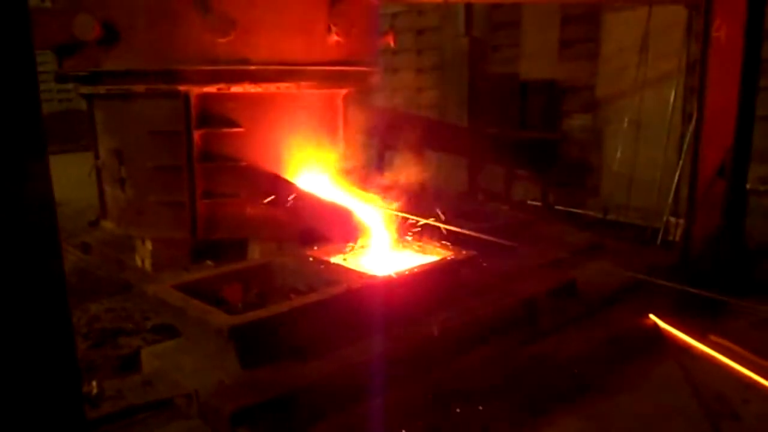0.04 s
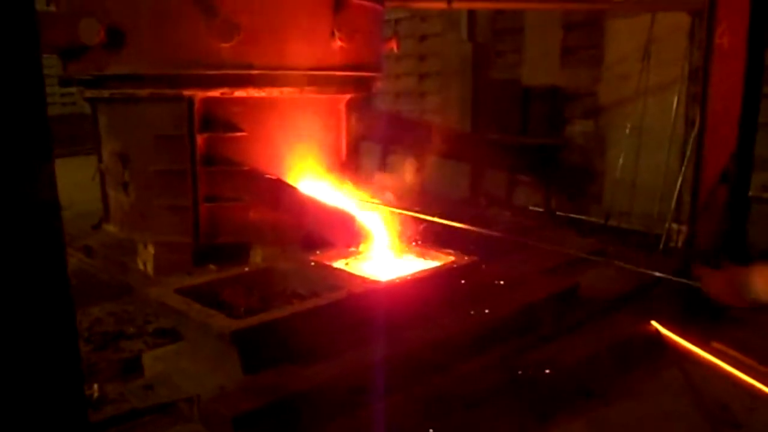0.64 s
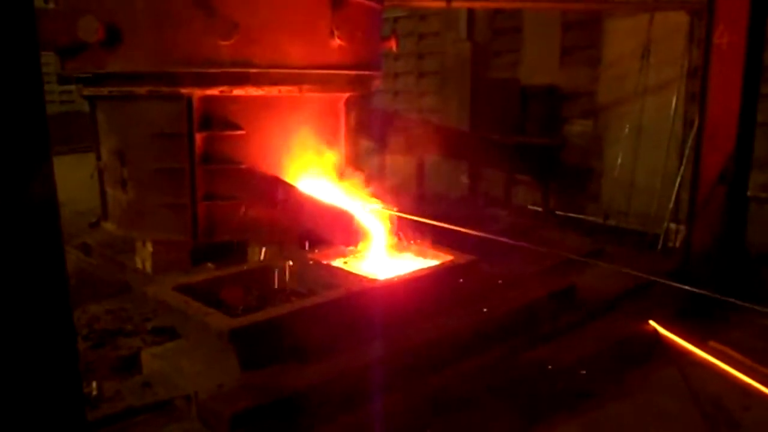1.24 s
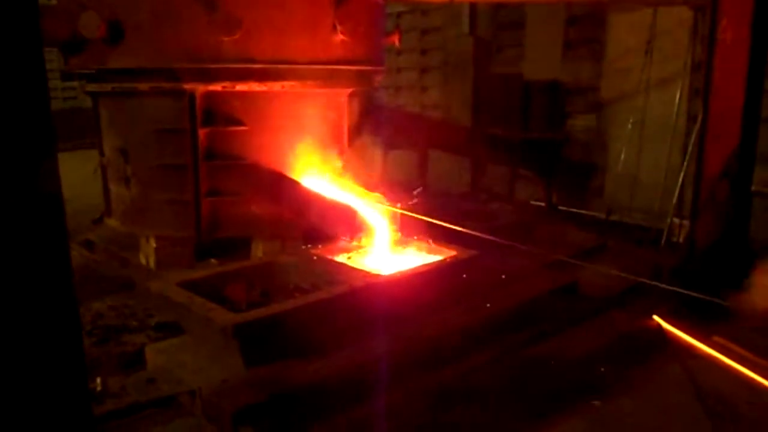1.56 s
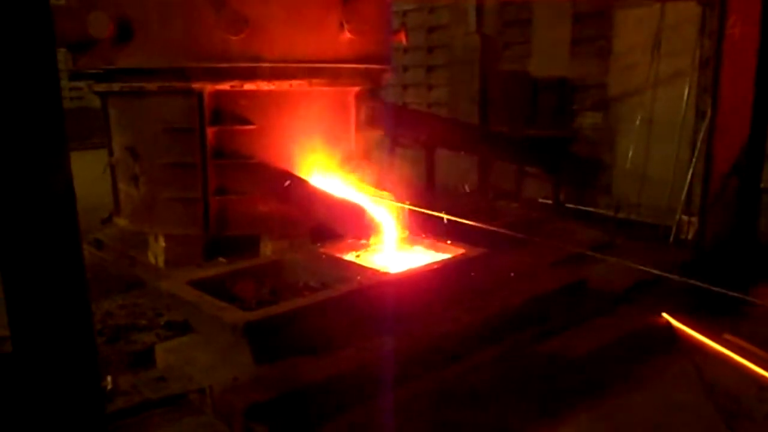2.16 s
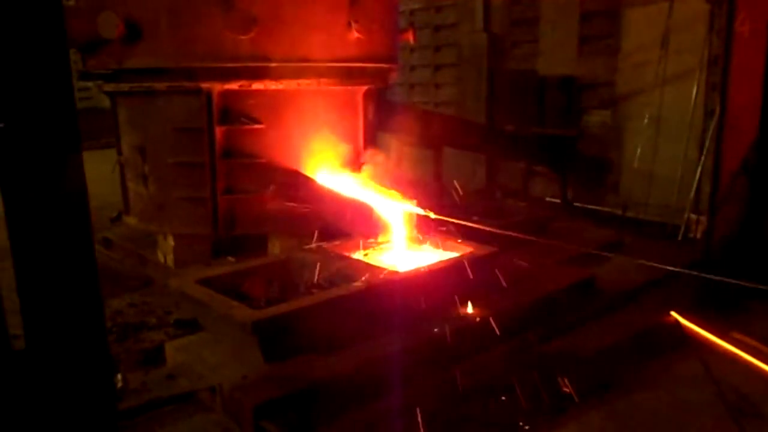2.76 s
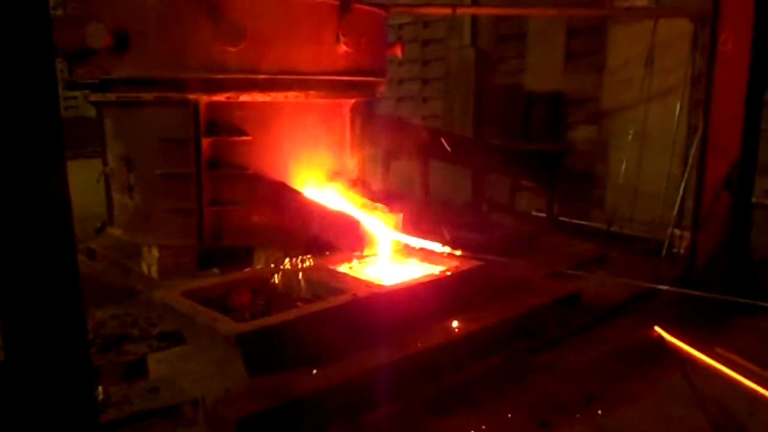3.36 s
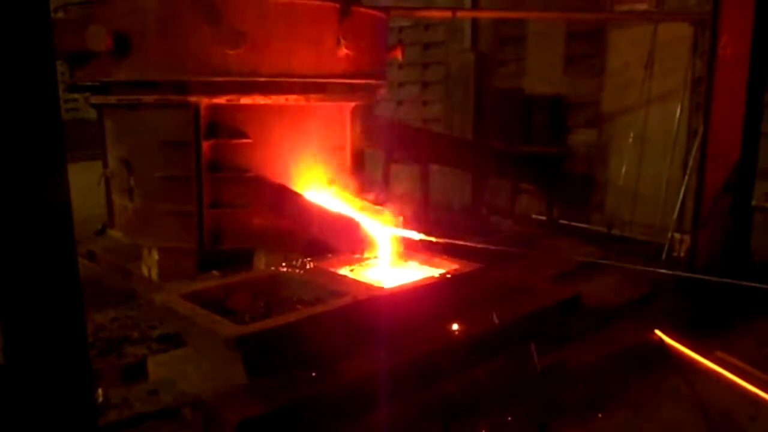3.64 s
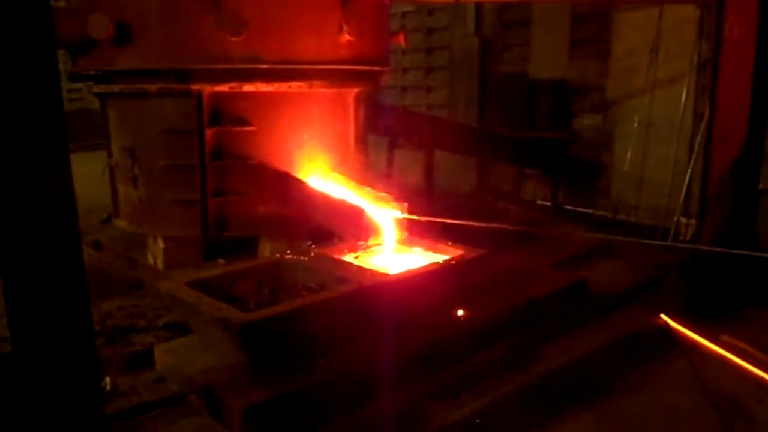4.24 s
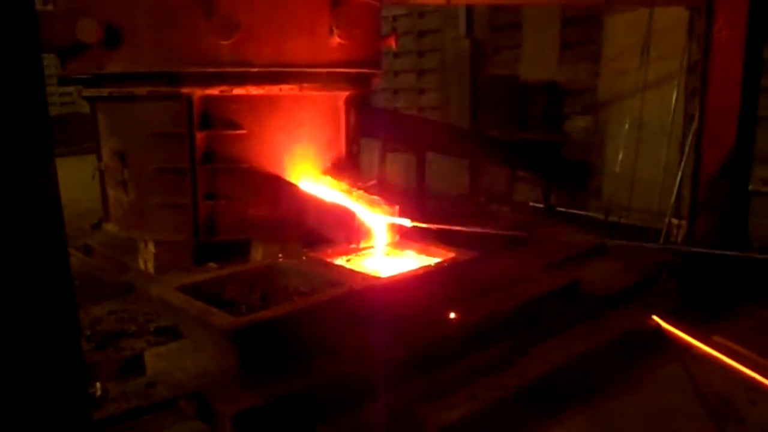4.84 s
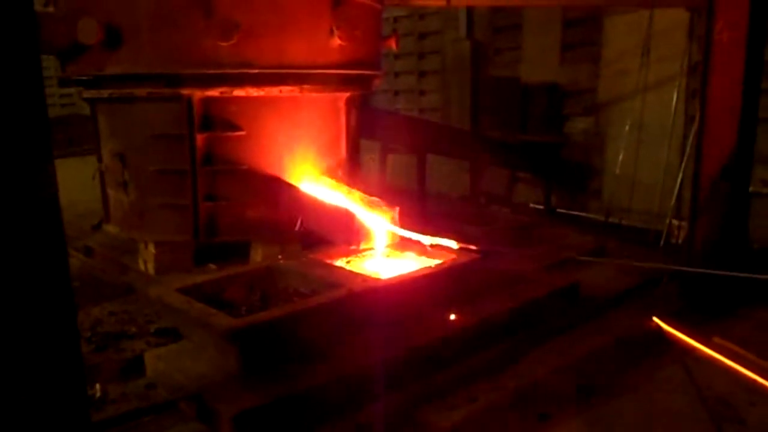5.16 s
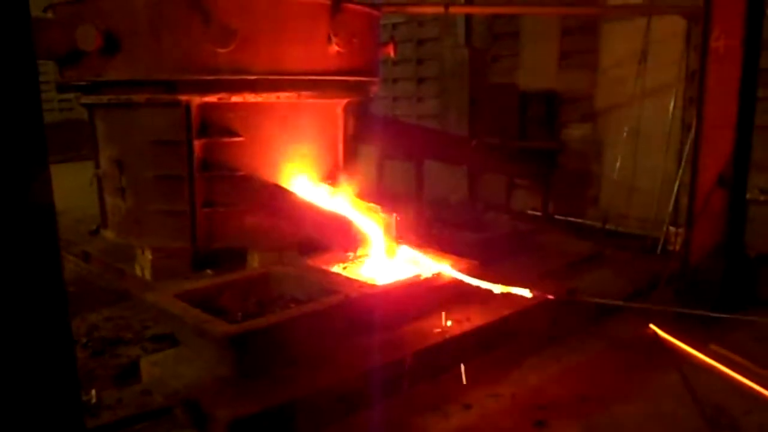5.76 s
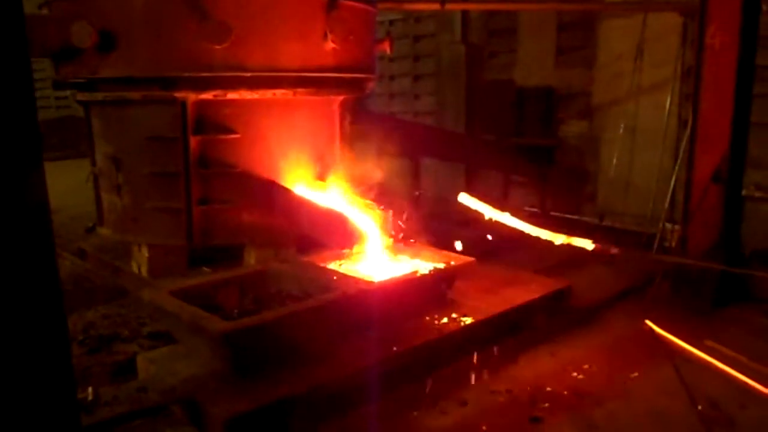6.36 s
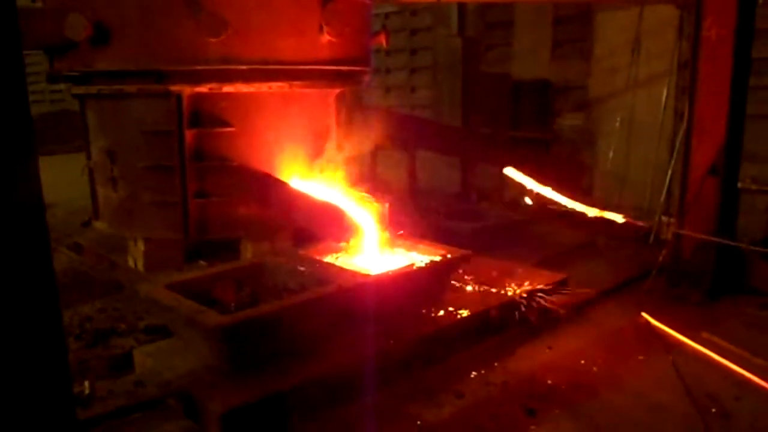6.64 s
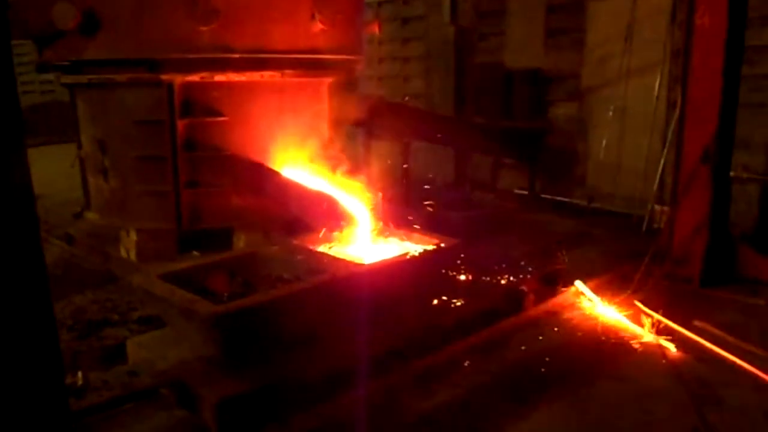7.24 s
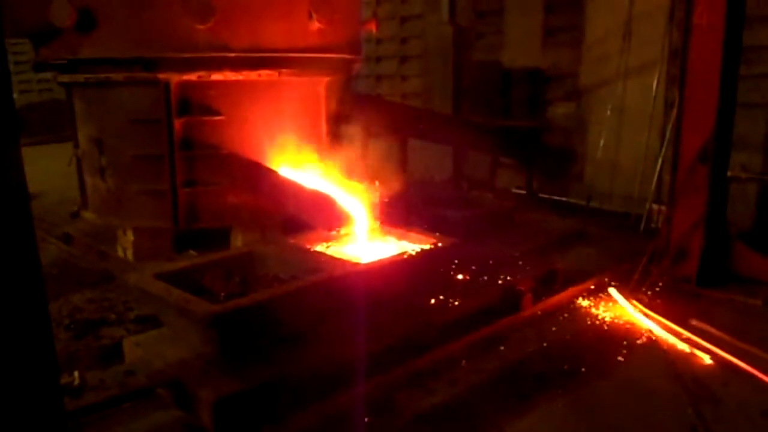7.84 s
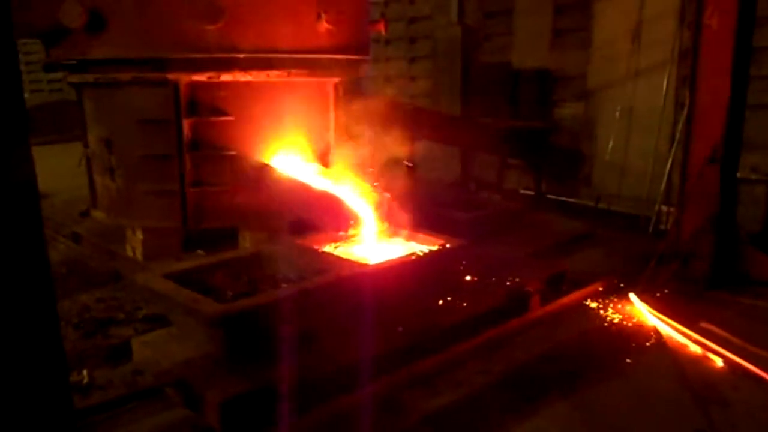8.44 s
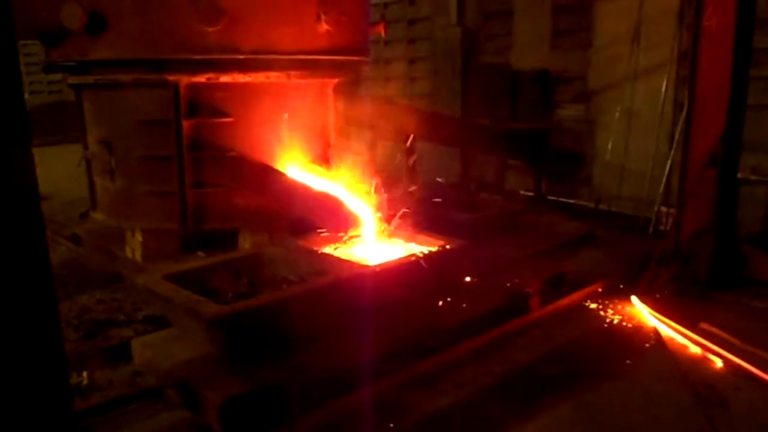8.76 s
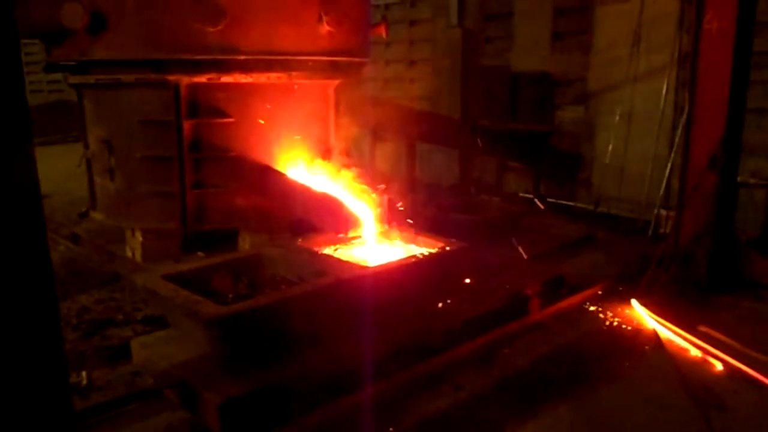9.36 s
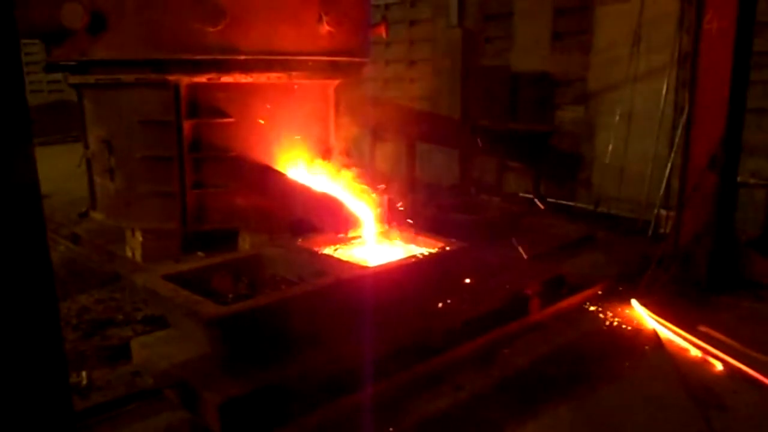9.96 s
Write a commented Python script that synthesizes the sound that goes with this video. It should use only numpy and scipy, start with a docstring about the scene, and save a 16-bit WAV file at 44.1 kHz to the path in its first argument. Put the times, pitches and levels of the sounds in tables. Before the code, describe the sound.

From the start a furnace roars loudly and steadily in a smelter hall as molten metal runs out. A low, wavering drone rings in the ducts, a blower hums, gas hisses and sparks crackle finely, all with slight short reflections. Near 0.9 seconds droplets burst with sharp snaps and a steel rod knocks and bounces with a short, high ring; the whole din dips slightly and creeps back. More snaps, each followed by a small dip, come at 2.8 and 6.4 seconds. Faint, brief high pings sound in the noise at about 2, 5.8, 6.3, 7.3 and 7.7 seconds. At 7.2 seconds a spark snaps and the rod is laid down with a softer clink. A very slight dip follows at 7.8 seconds. The roar carries on until 9.2 seconds, when everything stops dead.

```python
"""Molten metal runs from the tap hole of a furnace in a smelter hall. From the start the blast roars and drones
in shaft and ducts, a blower hums, gas hisses, sparks crackle. Near 0.9 s droplets burst, a steel rod knocks and
bounces, and the whole din dips and creeps back. From 2 s faint brief high pings sound in the din; bursts and
dips recur at 2.8 and 6.4 s. At 7.2 s a spark snaps and the rod is laid down. A slight dip follows; at 9.2 s all
sound ends abruptly."""
import sys
import numpy as np
from scipy import signal
from scipy.fft import rfft, irfft
from scipy.io import wavfile
from scipy.ndimage import uniform_filter1d

SR = 44100
rng = np.random.default_rng(int(sys.argv[2]) if len(sys.argv) > 2 else 0)


def to_wav(s):
    """Save 16-bit WAV."""
    ch = np.atleast_2d(s).T  # columns
    pcm = np.round(np.clip(ch, -1, 1) * 32767)  # PCM
    wavfile.write(sys.argv[1], SR, pcm.astype(np.int16))


N = 440559
TIME_S = np.arange(N) / SR
FREQ_HZ = np.fft.rfftfreq(N, 1 / SR)

# Gas flow through the furnace. Each row: time in seconds, strength in dB.
GAS_FLOW = [(0, 0.6), (0.8, 0.5), (1.45, 0.16), (2.05, 1), (2.25, -0.54), (3.35, 0.3), (4.05, -0.67),
            (5.1, 1.1), (5.5, 0.05), (5.8, 1), (6.05, 0.2), (6.4, 1.3), (7.3, 1.2), (8.15, 0.35),
            (8.65, 0.7), (9.2, 0.5)]
# Blast turbulence. Each row: frequency in Hz, relative density in dB.
ROAR_SPECTRUM = [(8, -69.5), (19, -55.5), (30, -65.5), (60, -64.5), (78, -66), (130, -59.5), (165, -53.5),
                 (560, -55), (770, -57), (880, -55.5), (1300, -58.5), (1550, -58), (1640, -61.5),
                 (2500, -62.5), (4000, -64.5), (10000, -78)]
# Air resonances of shaft and ducts. Each row: frequency in Hz, width in Hz, lift in dB.
DUCT_MODES = [(167, 6, 8.5), (209.5, 6, 10), (218, 7, 10), (231, 6.5, 6), (276.6, 7.9, 3.5),
              (335, 9.3, 3.5), (408.8, 6.4, 8.5), (426, 5, 2), (486.4, 8.2, 3.5), (853, 46, 3),
              (930, 12, 3.5), (974, 8.9, 1.5), (1078, 12, 6), (1142, 12, 3), (1227, 14, 4), (1427, 25, 3),
              (1820, 30, 4.5), (1970, 20, 3), (2215, 18, 5), (2438, 29, 4)]
# Strongest duct resonance. Each row: time in seconds, relative level in dB.
DRONE_LEVELS = [(0, -40.5), (0.35, -31.5), (1.0, -39), (1.6, -38.5), (1.88, -31.0), (2.15, -36.5),
                (2.7, -39), (3.0, -33), (4.65, -37.5), (5.0, -28), (5.45, -32.5), (5.85, -41), (6.4, -29.8),
                (6.7, -42), (7.15, -30), (7.45, -38.5), (7.75, -30), (9.2, -44)]
# Blower tones. Each row: multiple of shaft speed, relative level in dB, flutter from 0 to 1.
BLOWER_ORDERS = [(1, -41, .45), (3, -34, 0.5), (14, -49.5, 0.7), (15, -42, 0), (16, -40, 0.2),
                 (28, -47.5, 0.6), (30, -46.5, .5)]
# Gas jet at the tap hole. Each row: frequency in Hz, relative density in dB.
HISS_SPECTRUM = [(1500, -67.5), (3150, -68), (3800, -58.5), (4700, -58), (5300, -58), (6000, -61),
                 (7700, -61.5), (10000, -66)]
# Faint tap hole whistles. Each row: frequency in Hz, width in Hz, lift in dB.
WHISTLE_MODES = [(3400, 140, 3), (4940, 40, 2), (5075, 90, 4.2), (5275, 70, 1.8), (8920, 110, 1.8),
                 (9800, 180, 1.2)]
# Bursting droplets. Each row: start in seconds, level in dB, decay in seconds.
SPARK_BURSTS = [(.8578, -20, .0014), (.8785, -11, 0.0022), (0.8835, -15, .005), (2.788, -11, .0012),
                (2.7925, -18.5, .011), (6.3895, -26, .002), (6.398, -23.5, .005), (7.236, -19.5, .01)]
# Colour of sparks and rod contact. Each row: frequency in Hz, relative level in dB.
SNAP_SPECTRUM = [(500, -15), (2500, -11), (4500, -0.5), (6000, -4), (8300, -1), (10000, -0.5),
                 (12000, -25.5)]
# The rod knocks, bounces, is laid down. Each row: start in seconds, relative level in dB.
ROD_KNOCKS = [(.9347, -14.5), (0.9402, -13), (7.24, -25)]
# Steel rod modes. Each row: frequency in Hz, relative level in dB, T60 in seconds.
ROD_MODES = [(3360, -6, .13), (3500, -19.5, .13), (5140, -4, .08), (5400, -12, .08), (6100, -8.5, .07),
             (6400, -11, .07), (8800, -15, .05)]
# Faint brief high pings in the din.
# Each row: start in seconds, frequency in Hz, level in dB, T60 in seconds.
FAINT_PINGS = [(2.012, 5450, -17, .1), (5.76, 3800, -22, .15), (6.325, 2890, -27, .15),
               (7.255, 3120, -26, .15), (7.718, 2440, -21, .15)]
# Sudden dips of the whole din. Each row: start in seconds, nominal depth in dB.
LEVEL_DIPS = [(.888, 2.5), (.947, 2.5), (2.803, 3), (6.405, 4), (7.785, 1.2)]

ROAR_DB_PER_FLOW_DB, BLOWER_DB_PER_FLOW_DB = 1.1, .6
SURGE_TOP_HZ, SURGE_DB_PER_FLOW_DB, SURGE_DRIFT_DB = 481, .5, .5
DRONE_HZ, DRONE_WANDER_HZ = 332.5, 4.2
SHAFT_HZ, MOTOR_HUM_DB = 49.55, -43
MAINS_HUM_HZ, MAINS_HUM_DB = 100.06, -39
DIP_FALL_S, DIP_RECOVERY_S, STOP_S = .0098, .5, 9.238
PEAK_CEILING, LOWPASS_HZ = .8, 10350


def blast(flow_db):
    """The fluttering flame roar rings shaft and ducts; its deep part surges with the gas flow."""
    eddies = turbulence(patch_db=.58, patch_hz=500, patch_s=.06)
    roar = colour(eddies, spectrum_gain(ROAR_SPECTRUM) * resonance_gain(DUCT_MODES))
    deep = colour(roar, 1 / (1 + (FREQ_HZ / SURGE_TOP_HZ) ** 4))
    surge_db = SURGE_DB_PER_FLOW_DB * (flow_db - flow_db.mean()) + SURGE_DRIFT_DB * drift(3)
    roar = roar - deep + deep * gain_of(surge_db)
    return hall(roar, echo_db=-13.5) * gain_of(ROAR_DB_PER_FLOW_DB * flow_db + .27 * drift(11) + .2)


def duct_drone():
    """One duct mode sings almost as a tone, its phase wandering."""
    wander = drift(DRONE_WANDER_HZ) + 1j * drift(DRONE_WANDER_HZ)
    wander = wander / np.sqrt(abs(wander) ** 2 + .5)  # the swing saturates
    tone = (wander * np.exp(2j * np.pi * DRONE_HZ * TIME_S)).real
    level_db = np.interp(TIME_S, *np.transpose(DRONE_LEVELS)) + 1.9
    return unit_rms(tone) * gain_of(level_db)


def blower(flow_db):
    """Shaft tones waver in hot air; the motor's second order beats with the mains hum once a second."""
    turns = np.cumsum(SHAFT_HZ * (1 + .0002 * drift(1.6))) / SR
    tones = np.zeros(N)
    for order, db, flutter in BLOWER_ORDERS:
        waver = np.sqrt(2 * (1 - flutter ** 2)) + flutter * (drift(2) + 1j * drift(2.2))
        phasor = np.exp(2j * np.pi * (order * turns + rng.random()))
        tones += gain_of(db) * (waver * phasor).real
    motor = gain_of(MOTOR_HUM_DB) * unit_rms(np.sin(2 * np.pi * 2 * turns))
    mains = gain_of(MAINS_HUM_DB) * unit_rms(np.sin(2 * np.pi * MAINS_HUM_HZ * TIME_S))
    return tones * gain_of(BLOWER_DB_PER_FLOW_DB * flow_db + .4) + mains - motor


def gas_jet(flow_db):
    """Gas leaves the tap hole with a sputtering hiss and faint whistles."""
    eddies = turbulence(patch_db=.6, patch_hz=890, patch_s=.04)
    hiss = colour(eddies, spectrum_gain(HISS_SPECTRUM) * resonance_gain(WHISTLE_MODES))
    return hall(hiss, echo_db=-9.5) * gain_of(flow_db + .28 * drift(9) - .42)


def sparks(crackle_per_s=280, pop_decay_s=.0004):
    """Droplets burst with short snaps, over a fine crackle of countless small ones."""
    snap_gain = spectrum_gain(SNAP_SPECTRUM)
    power = np.zeros(N)
    for start_s, db, decay_s in SPARK_BURSTS:
        age_s = TIME_S - start_s
        power += gain_of(db) ** 2 * (age_s >= 0) * np.exp(-2 * (age_s / decay_s) ** 2)
    snaps = unit_rms(colour(rng.standard_normal(N), snap_gain)) * np.sqrt(power)
    pop_db = 2.6 * np.minimum(rng.exponential(1, N), 3.5)
    pops = gain_of(pop_db) * (rng.random(N) < crackle_per_s / SR)
    envelope = signal.lfilter([1], [1, -np.exp(-1 / (pop_decay_s * SR))], pops)
    crackle = colour(envelope * rng.standard_normal(N), snap_gain)
    return snaps + gain_of(-34.5) * unit_rms(crackle)


def steel_rod():
    """Each knock is a short gritty contact and a quickly damped ring."""
    age_s = np.arange(SR // 4) / SR
    grit = unit_rms(colour(rng.standard_normal(N), spectrum_gain(SNAP_SPECTRUM)))
    out = np.zeros(N)
    for start_s, db in ROD_KNOCKS:
        span = slice(round(start_s * SR), round(start_s * SR) + len(age_s))
        ring = sum(gain_of(mode_db - 60 * age_s / t60_s) * np.sin(2 * np.pi * (hz * age_s + rng.random()))
                   for hz, mode_db, t60_s in ROD_MODES)
        contact = grit[span] * np.exp(-age_s / .003)
        out[span] += gain_of(db) * (gain_of(-1) * ring + contact)
    return out


def faint_pings():
    """Each ping is one high tone dying away after a soft start."""
    out = np.zeros(N)
    for start_s, hz, db, t60_s in FAINT_PINGS:
        age_s = np.maximum(TIME_S - start_s, 0)
        attack = 1 - np.exp(-age_s / .002)
        out += gain_of(db - 60 * age_s / t60_s) * attack * np.sin(2 * np.pi * hz * age_s)
    return out


def hall(x, echo_db, count=40):
    """Reflections from walls and steelwork comb the sound finely."""
    delay_s, sign = rng.uniform(.004, .09, count), rng.choice([-1, 1], count)
    taps = np.zeros(N)
    taps[(delay_s * SR).astype(int)] = sign * gain_of(echo_db) / np.sqrt(count)
    bass_cut = FREQ_HZ ** 2 / (FREQ_HZ ** 2 + 400 ** 2)  # small surfaces reflect no bass
    echoes = colour(x, rfft(taps) * bass_cut)
    return (x + echoes) / np.sqrt(1 + gain_of(echo_db) ** 2)


def turbulence(patch_db, patch_hz, patch_s):
    """White noise of 0 dB per Hz in which eddies brighten short patches of the spectrum."""
    hz, frame_s, bins = signal.stft(rng.standard_normal(N), SR, nperseg=512, noverlap=384)
    patches = uniform_filter1d(rng.standard_normal(bins.shape), round(patch_hz / hz[1]), axis=0)
    patches = unit_rms(uniform_filter1d(patches, round(patch_s / frame_s[1]), axis=1))
    _, noise = signal.istft(bins * gain_of(patch_db * patches), nperseg=512, noverlap=384)
    return unit_rms(noise[:N]) * np.sqrt(SR / 2)


def drift(top_hz):
    """Slow random motion of rms 1."""
    return unit_rms(colour(rng.standard_normal(N), 1 / (1 + (FREQ_HZ / top_hz) ** 2)))


def resonance_gain(modes):
    """Gain per frequency of resonant peaks on a flat base."""
    peak_power = sum((gain_of(lift_db) ** 2 - 1) / (1 + (2 * (FREQ_HZ - hz) / width_hz) ** 2) ** 1.5
                     for hz, width_hz, lift_db in modes)
    return np.sqrt(1 + peak_power)


def spectrum_gain(points):
    """Gain per frequency, joining (Hz, dB) points on a log axis."""
    hz, db = np.transpose(points)
    return gain_of(np.interp(np.log(FREQ_HZ + 1), np.log(hz), db))


def colour(x, gain):
    """Filters x by a gain per frequency."""
    return irfft(rfft(x) * gain, N)


def gain_of(db):
    """Decibels to amplitude."""
    return 10 ** (np.asarray(db) / 20)


def unit_rms(x):
    """Scales to rms 1."""
    return x / np.sqrt(np.mean(x ** 2) + 1e-20)


def scene():
    """One gas flow drives roar, blower and hiss; both channels carry the same din."""
    flow_db = np.interp(TIME_S, *np.transpose(GAS_FLOW))
    furnace = blast(flow_db) + duct_drone() + blower(flow_db) + gas_jet(flow_db)
    din = furnace + sparks() + steel_rod() + faint_pings()
    return np.array([din, din])


def record(dry):
    """The level dips and creeps back, then stops dead; peaks are rounded and the band is limited."""
    dip_db = np.zeros(N)
    for start_s, depth_db in LEVEL_DIPS:
        age_s = np.maximum(TIME_S - start_s, 0)
        dip_db += depth_db * (1 - np.exp(-age_s / DIP_FALL_S)) * np.exp(-age_s / DIP_RECOVERY_S)
    stop_gate = np.clip((STOP_S - TIME_S) / .016 + .5, 0, 1)
    dc_free = signal.lfilter(*signal.butter(1, 5, "highpass", fs=SR), dry)
    gated = dc_free * gain_of(-dip_db) * stop_gate
    rounded = gated / (1 + (gated / PEAK_CEILING) ** 8) ** (1 / 8)
    lowpass = signal.firwin(221, LOWPASS_HZ, window=("kaiser", 9), fs=SR)
    return signal.oaconvolve(rounded, lowpass[None], "same")


dry = scene()
out = record(dry)
to_wav(out)
```